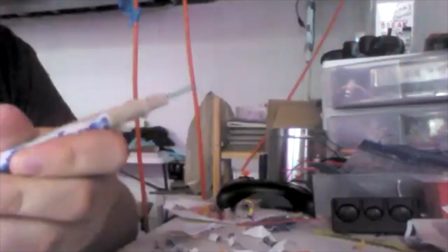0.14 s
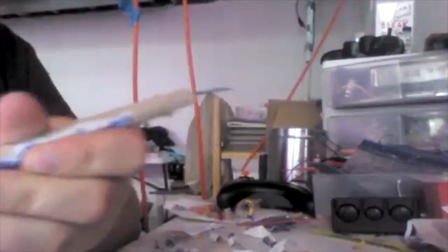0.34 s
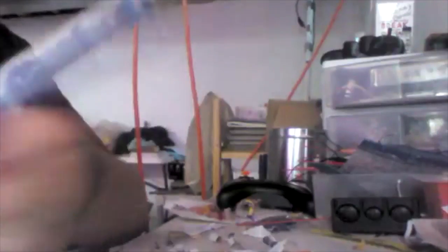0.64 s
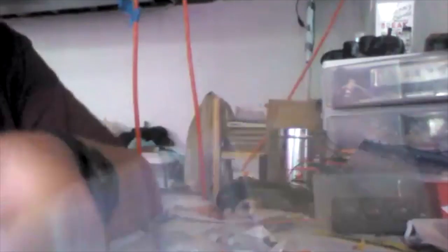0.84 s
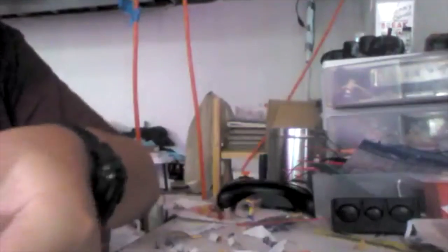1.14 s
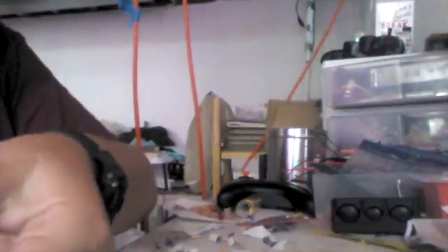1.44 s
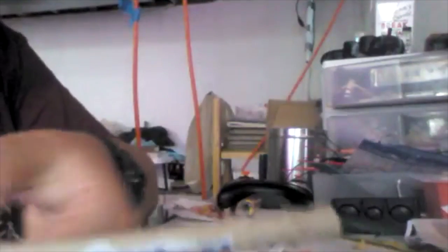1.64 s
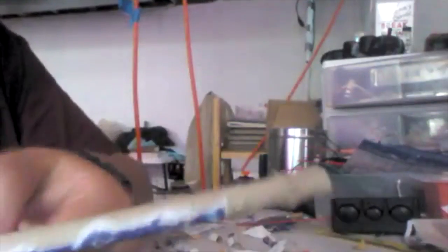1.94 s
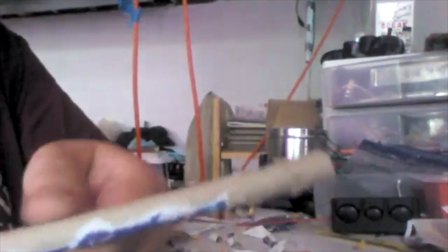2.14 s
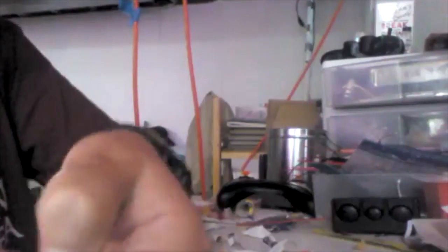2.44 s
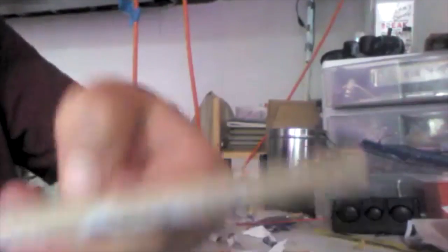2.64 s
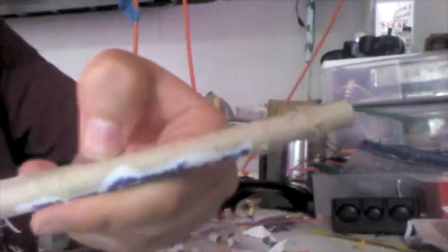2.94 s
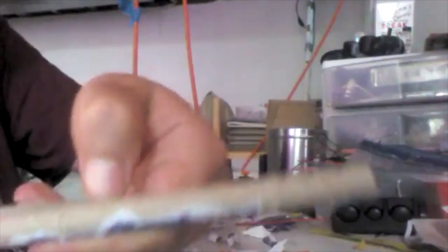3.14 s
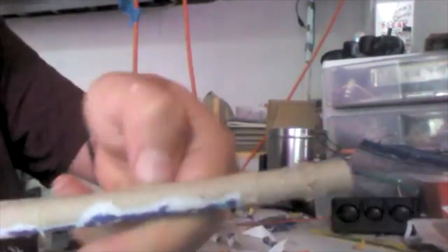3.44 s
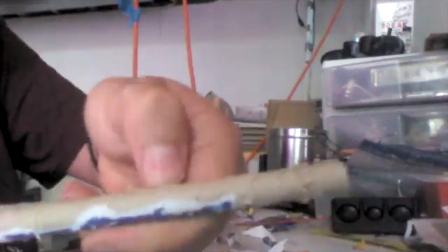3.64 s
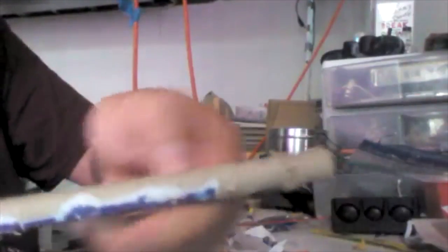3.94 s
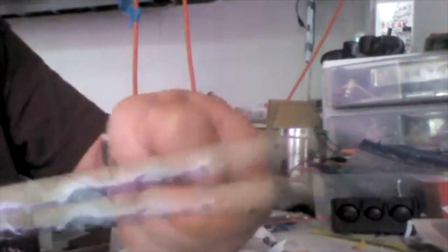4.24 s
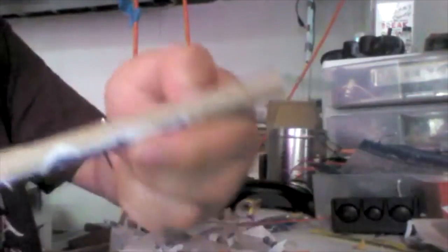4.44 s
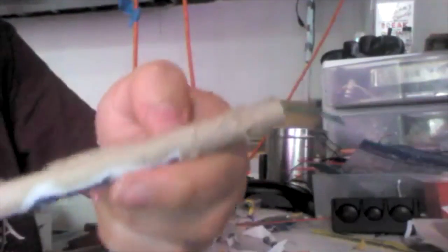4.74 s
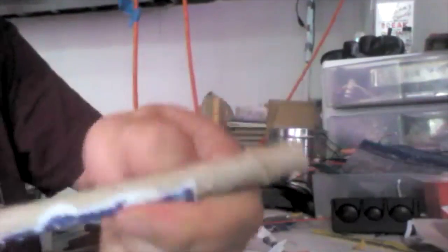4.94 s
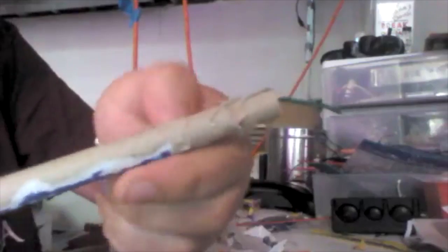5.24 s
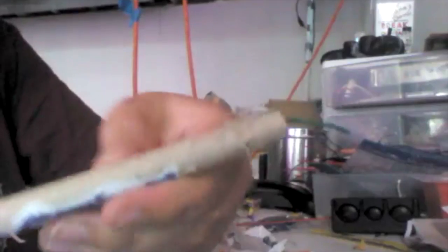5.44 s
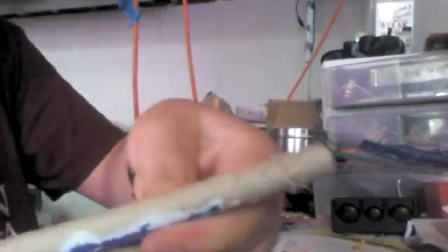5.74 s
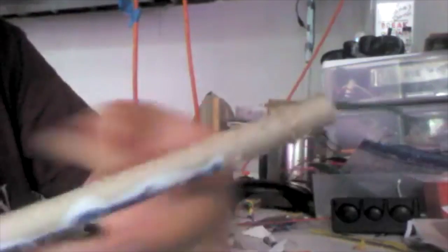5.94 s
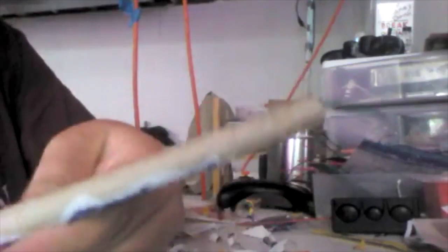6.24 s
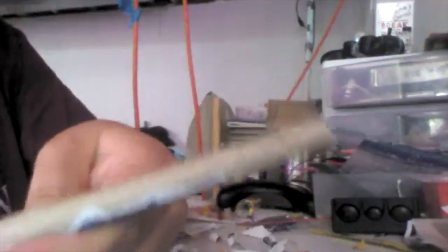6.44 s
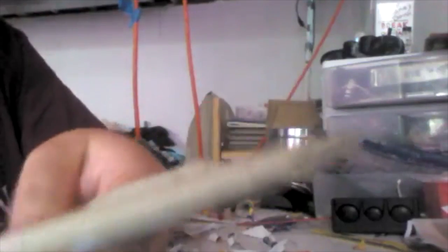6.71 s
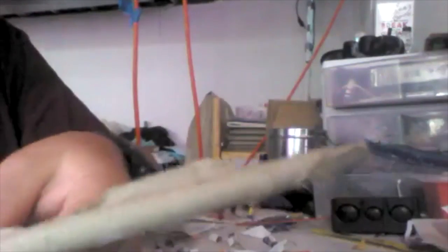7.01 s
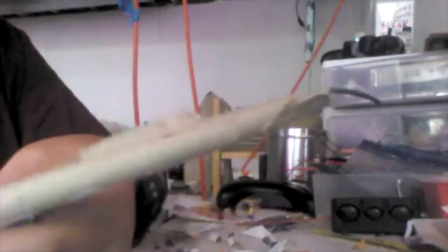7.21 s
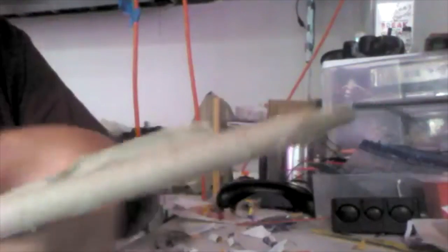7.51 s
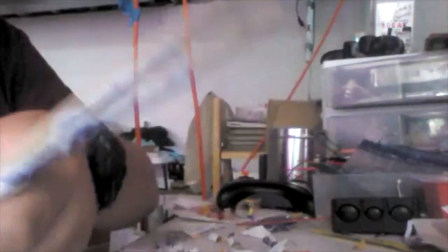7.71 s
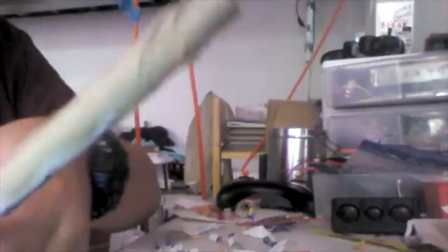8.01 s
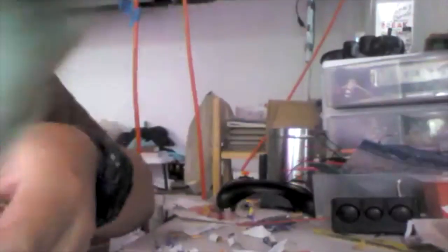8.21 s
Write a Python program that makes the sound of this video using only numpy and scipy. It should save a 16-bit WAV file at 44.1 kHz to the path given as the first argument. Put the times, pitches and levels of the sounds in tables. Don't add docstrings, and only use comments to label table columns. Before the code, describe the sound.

Fingers pick, snap and tear paper off a cardboard tube, a last strip ripping free as a motor starts humming near the end.

```python
import sys
import numpy as np
from scipy import signal
from scipy.fft import rfft, irfft
from scipy.io import wavfile
from scipy.ndimage import uniform_filter1d

SR = 44100
rng = np.random.default_rng(int(sys.argv[2]) if len(sys.argv) > 2 else 0)


def gain_from_db(level_db):
    decades = np.asarray(level_db, float) / 20
    return 10 ** decades


def bounce(signal):
    frames = np.transpose(np.atleast_2d(signal))
    limited = np.clip(frames, -1, 1)
    pcm = np.round(limited * 32767).astype(np.int16)
    wavfile.write(sys.argv[1], SR, pcm)


N = 369116
CUTOFF_HZ = 16300


def rms_one(x):
    return x / np.sqrt(np.mean(x ** 2) + 1e-20)


def in_time(rows, column):
    rows = np.array(rows)
    return np.interp(np.arange(N) / SR, rows[:, 0], rows[:, column])


def resonance(x, hz, width):
    r = np.exp(-np.pi * width / SR)
    poles = [1, -2 * r * np.cos(2 * np.pi * hz / SR), r * r]
    return signal.lfilter([(1 - r * r) / 2, 0, (r * r - 1) / 2], poles, x)


def body(x, modes, detune=1):
    out = 0
    for k, (hz, width, db) in enumerate(modes):
        out = out + (-1) ** k * gain_from_db(db) * resonance(x, hz * detune, width)
    return out


def drift(rate):
    r = np.exp(-80 * np.pi * rate / SR)
    white = rng.standard_normal(N // 40 + 2002)
    slow = signal.lfilter([1], [1, -2 * r, r * r], white)[2000:]
    return np.interp(np.arange(N) / 40, np.arange(len(slow)), rms_one(slow))


def grains(per_s, spread_db, clump_db):
    sizes = gain_from_db(spread_db * np.minimum(rng.exponential(1, N), 4)) * rng.choice([-1, 1], N)
    chance = per_s * gain_from_db(clump_db * drift(90)) / SR
    return sizes * (rng.random(N) < chance) + 1e-18


def breaks(events, column, modes, burst_s, crumble, trim_db, scales=None):
    out, t = np.zeros(N + 2000), np.arange(2000) / SR
    noise = rng.standard_normal((len(events), 2000))
    detune = rng.normal(1, 0.015, len(events))
    for k, row in enumerate(events):
        scale = scales[k] if scales else 1
        tuned = [(hz * scale, width * scale, db) for hz, width, db in modes]
        burst = (t == 0) + crumble * noise[k] * np.exp(-t / burst_s)
        sound = body(burst, tuned, detune[k])
        at = round(row[0] * SR)
        out[at:at + 2000] += sound / np.abs(sound).max() * gain_from_db(row[column] + trim_db)
    return out[:N]


def tone(hz, level_db):
    phase = 2 * np.pi * np.cumsum(hz) / SR
    return np.sqrt(2) * gain_from_db(level_db) * np.sin(phase + rng.uniform(0, 6.6))


# frequency in Hz, density in dB per Hz.
AIR_SPECTRUM = [(30, -13.5), (190, -19), (276, -1.5), (350, -2.5), (450, -7.5), (625, -7.5), (1750, -10),
                (2470, -11), (4000, -14.5), (6380, -16.5), (12900, -12.5), (13900, -11), (15300, -12.5),
                (16300, -26)]
# frequency in Hz, wander in Hz, level in dB rms.
FAN_WHINE = [(445, 4.79, -68.5), (720, 5.26, -76), (1344, 4.8, -72.5), (1778, 2.5, -72),
             (2285, 0.96, -69.5), (3340, 70, -74)]
AIR_DB = -57


def air():
    hz, points = np.maximum(np.fft.rfftfreq(N, 1 / SR), 1), np.array(AIR_SPECTRUM)
    colour = gain_from_db(np.interp(np.log(hz), np.log(points[:, 0]), points[:, 1]))
    spectrum = rfft(rng.standard_normal(N)) * colour * (hz < CUTOFF_HZ)
    hiss = rms_one(irfft(spectrum, N))
    whine = 0
    for line_hz, wander, db in FAN_WHINE:
        whine = whine + tone(line_hz + wander * drift(11.7), db + 0.33 * drift(6.8))
    gust_db = 0.5 * drift(3)
    return gain_from_db(AIR_DB + gust_db) * hiss + whine


# time in seconds, bright peak in dB, flap peak in dB, tube peak in dB, tube pitch in Hz.
SNAPS = [(0.2832, -36, -29, -39, 660), (0.4283, -10, -26.5, -29, 350), (1.204, -37, -34.5, -39, 530),
         (1.662, -13, -35, -33.5, 330), (3.4793, -14, -30.5, -26.5, 480), (4.432, -45, -39, -42, 799.4),
         (4.44, -8.5, -17, -19.5, 615), (4.4504, -35, -25, -42, 480), (5.1335, -11.5, -23, -26.5, 450),
         (5.1368, -29, -47, -30, 345), (5.1432, -43, -27, -35.5, 733), (6.2652, -26, -33, -49, 541),
         (6.3485, -46, -39, -31, 1150), (6.549, -31, -41, -41, 472.6), (6.5787, -25, -35, -36.5, 715),
         (6.764, -29, -43, -48, 730.6), (7.071, -31, -52, -43, 461), (7.1987, -19, -47, -39, 450)]
# frequency in Hz, width in Hz, level in dB.
BRIGHT_MODES = [(8640, 2370, -3), (11170, 1630, 9), (14600, 1900, -6)]
# frequency in Hz, width in Hz, level in dB.
FLAP_LOW = [(1770, 780, -8.5), (2960, 430, 0), (3556, 434, 4)]
FLAP_HIGH = [(4120, 590, -4), (5270, 380, 1.5), (6800, 1500, -6.5)]
# pitch and width as shares of the tube pitch, level in dB.
TUBE_MODES = [(.55, 0.83, -0.5), (1.0, 0.43, 5.5), (1.9, 1.67, -6.5), (3.4, 2.34, -8.5)]
UPPER_SHARE, UPPER_DB = 0.54, -8


def snaps():
    upper = [(s, flap + UPPER_SHARE * (db - flap) + UPPER_DB) for s, db, flap, *_ in SNAPS]
    tube_hz = [row[4] for row in SNAPS]
    bright = breaks(SNAPS, column=1, modes=BRIGHT_MODES, burst_s=0.0013, crumble=1.0, trim_db=0.6)
    low = breaks(SNAPS, column=2, modes=FLAP_LOW, burst_s=0.0021, crumble=0.193, trim_db=2.0)
    high = breaks(upper, column=1, modes=FLAP_HIGH, burst_s=0.00066, crumble=0.053, trim_db=4.0)
    tube = breaks(SNAPS, column=3, modes=TUBE_MODES, burst_s=0.0003, crumble=0.024, trim_db=-0.5,
                  scales=tube_hz)
    return bright + low + high + tube


# time in seconds, bright peak in dB, sheet peak in dB.
TICKS = [(1.6798, -28, -46), (1.769, -36, -55), (2.0588, -20, -46), (3.3104, -35.5, -54), (3.339, -35, -54),
         (3.355, -37, -56), (3.6393, -34, -56), (5.5495, -31, -50), (5.7756, -26, -49), (5.7825, -32, -43),
         (5.7989, -19, -44), (5.8209, -27, -54), (5.8284, -30, -45), (5.8882, -33, -55),
         (5.9351, -10.5, -50), (6.2494, -23.5, -37), (6.2888, -30, -39), (6.3422, -26, -44),
         (6.4512, -31, -42), (6.5704, -26, -32), (6.7241, -16, -40), (6.7205, -36, -26.5),
         (6.7311, -13.5, -28.5), (6.756, -26, -48), (6.772, -25, -49), (6.9573, -34, -52), (7.33, -28, -54),
         (7.4268, -8, -27), (7.491, -30, -53), (8.1588, -28, -41)]
# time in seconds, peak in dB.
CRACKLE_EARLY = [(0.4302, -25), (0.4316, -27), (0.6773, -37), (0.9391, -47), (1.0204, -37), (1.6634, -26),
                 (1.6651, -24), (1.7708, -38), (2.052, -27), (2.0564, -31), (2.4591, -39), (2.4708, -41),
                 (3.3461, -45), (3.4812, -23), (3.7835, -42), (3.8853, -44), (4.0192, -40), (4.0627, -44),
                 (4.0807, -38), (4.404, -41), (4.4415, -29), (5.1384, -28), (5.1515, -34), (5.1694, -39),
                 (5.2195, -47), (5.5392, -43), (5.5583, -39), (5.6815, -42), (5.7237, -42), (5.731, -34),
                 (5.7386, -42), (5.803, -25), (5.8045, -25), (5.8149, -34), (5.8982, -42), (5.9019, -37),
                 (5.9073, -37), (5.91, -32), (5.926, -35), (5.928, -29), (5.9432, -30), (5.9448, -23),
                 (5.9558, -28), (6.0448, -42), (6.0551, -39), (6.0827, -34)]
# time in seconds, peak in dB.
CRACKLE_LATE = [(6.2541, -34), (6.2715, -32), (6.3114, -41), (6.3194, -36), (6.3455, -32), (6.3474, -35),
                (6.3562, -30), (6.3959, -37), (6.4097, -38), (6.4373, -41), (6.4692, -35), (6.4869, -40),
                (6.5027, -43), (6.5136, -39), (6.5457, -40), (6.5514, -34), (6.5846, -35), (6.5926, -37),
                (6.6477, -41), (6.6554, -39), (6.6841, -24.5), (6.7007, -21), (6.7028, -31), (6.7095, -30),
                (6.7126, -28), (6.7155, -24), (6.7582, -26), (6.8892, -36), (7.0022, -32), (7.0287, -42),
                (7.0729, -25), (7.1955, -39), (7.2005, -18), (7.2488, -10), (7.3761, -39), (7.3916, -37),
                (7.4001, -37), (7.4382, -29), (7.4435, -19), (7.4488, -27), (7.4505, -26), (7.4558, -30),
                (7.4578, -24), (7.4606, -32), (7.4704, -30), (7.4764, -32), (7.4814, -24), (7.493, -34),
                (7.5032, -38), (7.534, -32.5), (7.6448, -32.5), (8.147, -41), (8.1743, -39), (8.3446, -35)]
# frequency in Hz, width in Hz, level in dB.
SHEET_MODES = [(1520, 1100, -9), (3240, 1290, -1.5), (4760, 1600, -4.5), (7930, 3500, -6.5)]
CRACKLE_SHEET_DB = -25


def ticks():
    cracks = list(CRACKLE_EARLY) + list(CRACKLE_LATE)
    events = TICKS + [(s, db, db + CRACKLE_SHEET_DB) for s, db in cracks]
    bright = breaks(events, column=1, modes=BRIGHT_MODES, burst_s=0.00047, crumble=0.7, trim_db=1.5)
    return bright + breaks(events, column=2, modes=SHEET_MODES, burst_s=0.0016, crumble=0.16, trim_db=2.0)


# peak
# in seconds, length in seconds, pitch in Hz, level in dB.
SCUFFS = [(0.431, .0015, 5070, -33), (1.11, 0.026, 5100, -56.5), (1.6715, .003, 3600, -40),
          (1.677, 0.0036, 3450, -38), (2.21, 0.013, 3420, -47.5), (3.435, .008, 955, -53),
          (3.44, .01, 330, -46), (3.712, .005, 880, -47), (3.73, 0.0063, 340, -42), (4.85, .012, 1100, -58),
          (5.05, 0.014, 650, -59), (5.186, .003, 1200, -51), (5.761, .012, 400, -54.5),
          (4.441, 0.0013, 1650, -33), (6.103, 0.014, 1710, -51.5), (6.15, .012, 520, -52.5),
          (7.803, .022, 5180, -55), (3.439, 0.019, 1900, -54), (6.276, .018, 430, -62),
          (6.95, .035, 1640, -57), (7.039, 0.014, 480, -45.5), (7.177, .015, 450, -50.5),
          (7.225, .014, 1580, -47), (7.25, .01, 1250, -43.5), (8.16, .006, 4200, -54)]
SCUFF_WIDTH = 0.26


def scuffs():
    out, t = np.zeros(N), np.arange(-4000, 4000) / SR
    shape = (len(SCUFFS), 8000)
    slips = rng.standard_normal(shape) * rng.exponential(1, shape)
    for (s, length, hz, db), slip in zip(SCUFFS, slips):
        width = SCUFF_WIDTH * hz
        rung = resonance(resonance(slip, hz, width), hz, width)
        at = round(s * SR) - 4000
        out[at:at + 8000] += gain_from_db(db) * rms_one(rung) * np.exp(-(t / length) ** 2)
    return out


# peak in seconds, rise in seconds, fall in seconds, fibre level in dB, sheet level in dB.
PICKS = [(.525, .021, 0.034, -48, -55.5), (.647, .012, .025, -64, -53.5),
         (.679, 0.015, 0.011, -48.5, -52.5), (1.02, .008, .012, -54, -68),
         (1.102, 0.022, 0.091, -50, -54.5), (1.206, 0.027, 0.021, -51, -46.5),
         (1.532, 0.025, 0.056, -73, -55.5), (1.77, 0.0074, 0.0093, -46, -41),
         (2.045, .06, .021, -46.5, -65), (2.058, .011, 0.024, -30.5, -49), (2.156, .018, 0.1, -45, -53),
         (2.211, .03, 0.021, -46, -54), (2.342, 0.054, .03, -56, -55.5),
         (2.457, 0.0058, 0.04, -50.5, -50.5), (3.645, 0.11, .035, -43.5, -58), (3.72, .045, .021, -45, -56),
         (3.897, 0.027, 0.04, -48, -62), (4.014, 0.036, 0.025, -45, -54.5),
         (4.108, 0.043, 0.12, -46.5, -53.5), (4.151, 0.11, 0.044, -46.5, -53), (4.23, .15, .11, -59, -58.5),
         (4.564, 0.025, 0.014, -53, -74), (5.17, 0.047, .05, -49.5, -63), (5.262, .04, .03, -52.5, -75),
         (.468, .02, 0.054, -51, -61), (5.336, 0.04, 0.031, -53.5, -80)]
# peak in seconds, rise in seconds, fall in seconds, fibre level in dB, sheet level in dB.
TEARS = [(5.554, .027, .013, -42.5, -53.5), (5.673, 0.018, 0.018, -45.5, -53.5),
         (5.728, 0.016, 0.025, -49, -67), (5.802, 0.028, 0.039, -38, -53),
         (5.831, 0.054, 0.018, -42, -54.5), (5.91, .025, .05, -47, -61), (5.94, 0.026, 0.029, -36, -52),
         (6.085, .012, 0.031, -38.5, -53), (6.05, .012, 0.035, -51, -61),
         (6.111, 0.045, 0.0075, -41.5, -48.5), (6.165, .012, 0.066, -48, -58),
         (6.195, 0.059, .025, -46.5, -58), (6.266, 0.021, 0.055, -43, -51), (6.29, 0.035, 0.016, -41, -58),
         (6.34, .06, 0.11, -44, -59), (6.432, .05, .05, -49, -63), (6.504, .025, 0.032, -53, -55.5),
         (6.581, .045, 0.029, -42.5, -49), (6.737, 0.07, 0.047, -33, -46), (6.895, .035, 0.095, -44, -58),
         (6.93, .06, .08, -39.5, -58), (7.11, .02, .03, -49, -63), (6.979, 0.15, 0.038, -40, -53.5),
         (7.003, .05, 0.016, -43, -56), (6.66, .02, .03, -49, -65)]
# peak in seconds, rise in seconds, fall in seconds, fibre level in dB, sheet level in dB.
CRUMPLES = [(7.249, 0.019, 0.053, -19.5, -39), (7.32, .05, 0.058, -42, -56), (7.42, 0.2, .011, -51, -55.5),
            (7.46, .05, 0.069, -40, -52.5), (7.538, .008, .016, -42, -60), (7.648, .006, .02, -48, -65),
            (7.765, .015, .015, -50, -62), (7.71, 0.19, 0.076, -48, -56), (7.85, 0.13, 0.1, -50, -55),
            (8.01, .04, .04, -53, -60), (7.884, .025, .025, -40, -53), (8.1, 0.42, 0.59, -57, -58),
            (8.162, 0.038, 0.031, -44, -50.5), (8.349, 0.024, 0.068, -43.5, -46.5)]
# time in seconds, fibre level in dB, sheet level in dB.
RECOILS = [
    (0.432, -32, -43.5),
    (1.661, -30, -35),
    (3.478, -45, -43),
    (4.443, -39, -35.5),
    (5.137, -36, -42),
    (7.073, -36, -43),
    (7.198, -25.5, -42),
    (7.427, -32, -54),
]
RECOIL_RISE_S, RECOIL_FALL_S = 0.0021, 0.028
SHOULDER = 1.11
SHEET_SLOPE = 0.89


def pulls():
    recoils = [(s, RECOIL_RISE_S, RECOIL_FALL_S, fibre_db, sheet_db) for s, fibre_db, sheet_db in RECOILS]
    s, rise, fall, fibre_db, sheet_db = np.array(PICKS + TEARS + CRUMPLES + recoils).T[:, :, None]
    t = np.arange(0, N + 20, 20) / SR
    away = np.maximum((s - t) / rise, (t - s) / fall)
    away[:-len(RECOILS)] **= SHOULDER
    down_db = 20 * away
    eased_db = SHEET_SLOPE * down_db + np.maximum(down_db - 23, 0)
    levels = fibre_db - down_db, sheet_db - eased_db
    return [gain_from_db(np.interp(np.arange(N) / SR, t, db.max(axis=0))) for db in levels]


# frequency in Hz, width in Hz, level in dB.
FIBRE_MODES = [(8650, 2200, -3), (11160, 1400, 8.5), (14600, 2000, -8.5)]


def rips(fine, coarse):
    pull, shake = pulls()
    fibres = pull * rms_one(body(fine, FIBRE_MODES))
    low_cut = signal.butter(4, 7200, "high", fs=SR, output="sos")
    sheet = shake * rms_one(body(coarse + 0.16 * fine, SHEET_MODES))
    return signal.sosfilt(low_cut, fibres) + sheet


# start in seconds, peak in seconds, end in seconds, peak level in dB, upper part in dB.
RUBS = [(2.673, 2.684, 2.79, -51.5, -23), (2.998, 3.014, 3.17, -55, -11), (3.415, 3.435, 3.59, -42.5, -5),
        (3.555, 3.572, 3.75, -50, 1.5), (3.69, 3.716, 3.91, -44, -6.5), (3.88, 3.9, 3.9, -49.5, -8),
        (4.085, 4.255, 4.3, -60.5, 0), (4.505, 4.517, 4.65, -49.5, 1), (4.835, 4.839, 5.15, -54.5, -2),
        (5.024, 5.038, 5.33, -51, -8), (5.46, 5.49, 5.8, -52, -14), (5.782, 5.796, 6.23, -59, 0.5),
        (6.14, 6.141, 6.153, -45, -2), (6.23, 6.283, 6.4, -55, -11), (6.544, 6.55, 6.7, -54.5, -9),
        (6.693, 6.703, 7.14, -56, -1), (3.267, 3.28, 3.34, -57, 1), (7.028, 7.064, 7.2, -46.5, -14),
        (7.2, 7.245, 7.4, -40, -9.5)]
# frequency in Hz, width in Hz, level in dB.
RUB_LOW = [(300, 68, 1.8), (480, 244, -4.5)]
RUB_HIGH = [(815, 237, 0.5), (1500, 660, -8.5)]
RUB_RISE_DB, RUB_FALL_DB, RUB_BRIGHT_DB, RUB_DULL_DB = 12, 23.5, 2.5, -12


def rubs():
    start, peak, end, db, upper_db = np.array(RUBS).T[:, :, None]
    t = np.arange(0, N + 40, 40) / SR
    before = np.maximum((peak - t) / (peak - start), 0)
    after = np.maximum((t - peak) / (end - peak), 0)
    low_db = db - RUB_RISE_DB * before ** 2 - RUB_FALL_DB * after
    high_db = low_db + upper_db + RUB_BRIGHT_DB * np.minimum(before, 1) + RUB_DULL_DB * after
    low, high = [gain_from_db(np.interp(np.arange(N) / SR, t, level.max(axis=0))) for level in (low_db, high_db)]
    slips = grains(per_s=4000, spread_db=3.0, clump_db=1.5)
    return 0.73 * low * rms_one(body(slips, RUB_LOW)) + high * rms_one(body(slips, RUB_HIGH))


# time in seconds, peak in dB.
BUMPS = [
    (2.68, -46),
    (5.04, -49),
    (5.485, -61),
    (7.027, -39),
]
# frequency in Hz, width in Hz, level in dB.
BUMP_MODES = [(331, 8.6, 2), (450, 19, -1), (576, 29, -2)]


def bumps():
    return breaks(BUMPS, column=1, modes=BUMP_MODES, burst_s=0.0042, crumble=0.086, trim_db=-5.5)


# peak in seconds, length in seconds, start pitch in Hz, end pitch in Hz, level in dB.
SKIDS = [
    (3.568, .007, 1500, 800, -48),
    (3.595, 0.021, 1000, 650, -53),
    (3.722, .008, 1150, 500, -53),
    (3.902, .008, 750, 400, -52),
    (4.518, 0.013, 1500, 900, -52),
]
SKID_ROUGH = 0.55


def skids():
    out, t = np.zeros(N), np.arange(-4000, 4000) / SR
    rough = 1 + SKID_ROUGH * 6 * uniform_filter1d(rng.standard_normal((len(SKIDS), 8000)), size=60)
    for (s, length, start_hz, end_hz, db), flutter in zip(SKIDS, rough):
        hz = np.interp(t, [-length, length], [start_hz, end_hz])
        squeak = flutter * np.sin(2 * np.pi * np.cumsum(hz) / SR)
        at = round(s * SR) - 4000
        out[at:at + 8000] += gain_from_db(db) * squeak * np.exp(-(t / length) ** 2)
    return out


# time in seconds, rasp in dB, ring in dB.
STRIP = [
    (7.198, -27.5, -70),
    (7.234, -49, -62),
    (7.25, -24.5, -34),
    (7.29, -45, -50),
    (7.305, -47, -70),
    (7.33, -54, -75),
]
# frequency in Hz, width in Hz, level in dB.
RASP_MODES = [(8100, 1340, -0.13), (9550, 500, -1.8)]
RING_MODES = [(4950, 120, 0), (2878.4, 110, -7.5)]


def last_strip(fine, coarse):
    rows = [(STRIP[0][0] - 0.002, -95, -95), *STRIP, (STRIP[-1][0] + 0.01, -95, -95)]
    rasp = gain_from_db(in_time(rows, column=1)) * rms_one(body(fine, RASP_MODES))
    return rasp + gain_from_db(in_time(rows, column=2)) * rms_one(body(coarse, RING_MODES))


def narrow_noise(modes):
    white, out = rng.standard_normal(N), 0
    for hz, width, db in modes:
        out = out + gain_from_db(db) * rms_one(resonance(resonance(white, hz, width), hz, width))
    return out


# time in seconds, speed in Hz.
SPEED = [
    (7.19, 107.5),
    (7.26, 108.5),
    (7.295, 114.7),
    (7.36, 113.6),
    (7.6, 113.2),
    (8.37, 113.05),
]
# multiple of the shaft speed, level in dB rms.
SHAFT = [(3, -47.5), (3.5, -69.5), (4, -65), (6, -68.5), (8, -72), (9, -66), (12, -52.5), (14.12, -65.5),
         (15, -72), (24.1, -69.5), (30, -71), (32.56, -72), (34.7, -71.5), (51, -69.5), (57, -70)]
# multiple of the mains pitch, level in dB rms.
MAINS = [(2, -67.5), (4, -51), (6, -60.5), (8, -62), (10, -68), (66.2, -70), (68.2, -64.5), (70.2, -68),
         (72.7, -73)]
# time in seconds, pitch in Hz, level in dB rms.
SQUEAL = [
    (7.45, 5143, -85),
    (7.55, 5130, -72),
    (7.64, 5080, -68),
    (7.8, 5110, -63.5),
    (7.9, 5090, -71),
    (8.0, 5085, -76),
]
# frequency in Hz, width in Hz, level in dB rms.
CASING = [(372, 280, -56), (1100, 970, -58), (3780, 780, -68), (8400, 900, -62)]
MAINS_HZ = 120.05
MOTOR_ON_S, SPIN_UP_DB_PER_S, RUN_DB = 7.222, 422, 1.1
SAG_S, SAG_WIDTH_S, SAG_DB = 7.232, 0.012, -8
INRUSH_S, INRUSH_WIDTH_S, INRUSH_DB = 7.255, 0.03, 6
WARM_S = 0.21


def motor():
    t, shaft_hz = np.arange(N) / SR, in_time(SPEED, column=1)
    on_db = RUN_DB + np.clip(SPIN_UP_DB_PER_S * (t - MOTOR_ON_S), -60, 0)
    shaft_db = on_db + SAG_DB * np.exp(-((t - SAG_S) / SAG_WIDTH_S) ** 2)
    mains_db = on_db + INRUSH_DB * np.exp(-((t - INRUSH_S) / INRUSH_WIDTH_S) ** 2)
    cold = np.exp(-np.maximum(t - MOTOR_ON_S, 0) / WARM_S)
    early = np.clip(8.0 - t, 0, 1)
    lines = 0
    for multiple, db in SHAFT:
        hz = multiple * (shaft_hz + 0.09988 * drift(17.0))
        lines = lines + tone(hz, db + shaft_db - 0.0082 * multiple ** 2 * early + 0.61 * drift(16.0))
    for multiple, db in MAINS:
        hz = multiple * (MAINS_HZ + 0.1206 * drift(15.3))
        lines = lines + tone(hz, db + mains_db - 0.27 * multiple * cold + 1.4 * drift(17.8))
    squeal_hz = in_time(SQUEAL, column=1) + 30 * drift(139.7)
    squeal = tone(squeal_hz, in_time(SQUEAL, column=2) + shaft_db + 3.0 * drift(15.0))
    warm_casing = (1 - cold) * gain_from_db(2.1 * drift(6.62)) * narrow_noise(CASING[3:])
    return lines + squeal + gain_from_db(shaft_db) * (narrow_noise(CASING[:3]) + warm_casing)


def bench(x, t60, wet_db):
    t = np.arange(round(0.15 * SR)) / SR
    tail = rng.standard_normal(len(t)) * gain_from_db(-60 * t / t60) * (t > 0.0015)
    return x + gain_from_db(wet_db) * signal.fftconvolve(x, tail / np.sqrt(np.sum(tail ** 2)))[:N]


# frequency in Hz, width in Hz.
GAPS = [(2550, 350), (4600, 400)]


def hollow(x):
    for hz, width in GAPS:
        x = x - 0.8 * resonance(x, hz, width)
    return x


def scene():
    fine = grains(per_s=9000, spread_db=2.6, clump_db=3.5)
    coarse = grains(per_s=4000, spread_db=4.5, clump_db=1.5)
    knocks = hollow(bench(snaps() + ticks() + bumps(), t60=0.049, wet_db=-14.5))
    hands = knocks + scuffs() + rips(fine, coarse) + rubs() + skids() + last_strip(fine, coarse)
    low_cut = signal.butter(4, 225, "high", fs=SR, output="sos")
    return (signal.sosfilt(low_cut, hands + motor()) + air())[None]


def roll_off(x):
    return signal.sosfilt(signal.butter(12, 16810, fs=SR, output="sos"), x)


def record(dry):
    top_cut = signal.cheby2(10, 50, CUTOFF_HZ + 500, fs=SR, output="sos")
    mix = signal.sosfilt(top_cut, dry)
    return roll_off(mix)


dry = scene()
out = record(dry)
bounce(out)
```